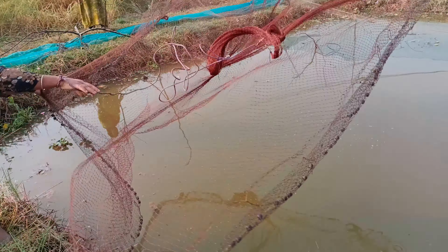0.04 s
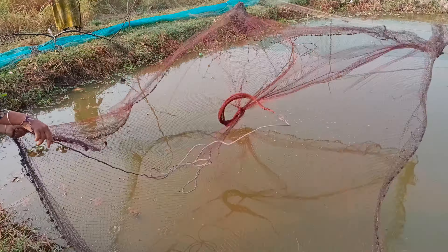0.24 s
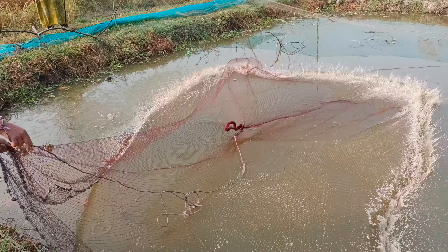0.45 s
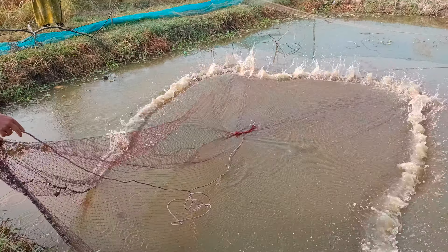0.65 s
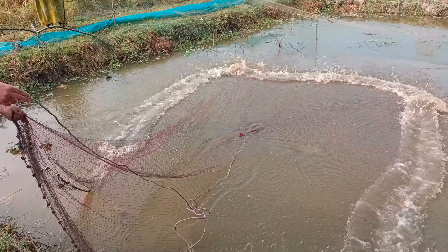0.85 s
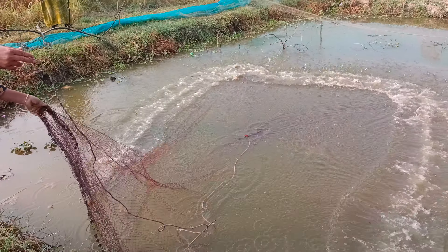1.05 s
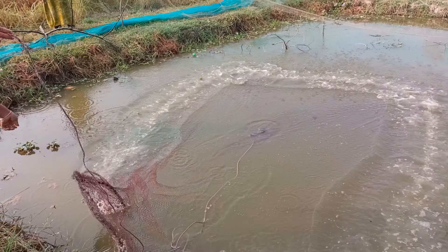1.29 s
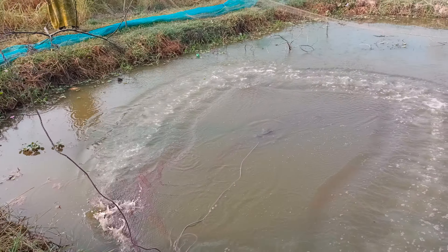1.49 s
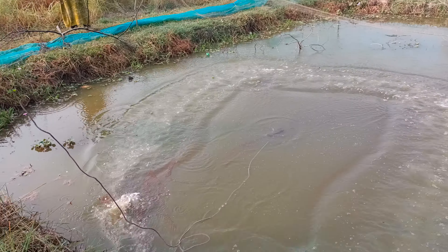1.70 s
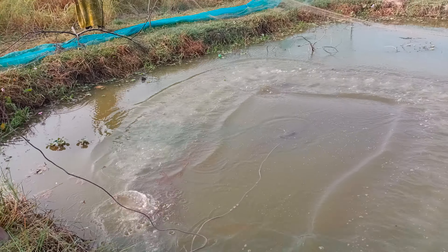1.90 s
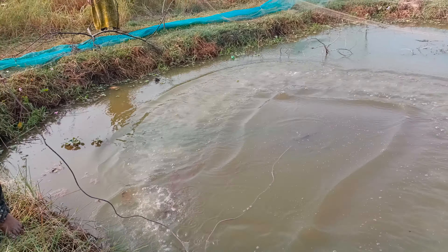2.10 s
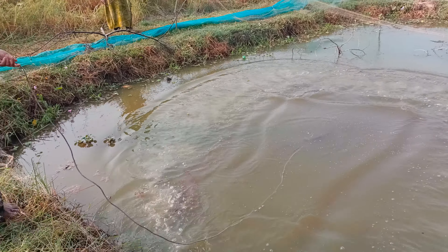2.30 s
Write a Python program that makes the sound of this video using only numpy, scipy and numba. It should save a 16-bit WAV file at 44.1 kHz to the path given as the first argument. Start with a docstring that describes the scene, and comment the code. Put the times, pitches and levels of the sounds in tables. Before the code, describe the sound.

Weighted net hitting water with a hissing, plunking splash, then bubbles, a slop and drips.

```python
"""At the edge of a pond, open air with a faint low rumble, heard on a phone's two microphones.
A cast net swishes out and lands on the water: the mesh hits as a hiss, the lead weights plunge in one
after another, and thrown spray patters back over fizzing bubbles. A second later the trailing bunch
of net slops in by the near bank, to the left, and a few drips follow."""
import sys
import numpy as np
from scipy import signal
from scipy.fft import rfft, irfft, next_fast_len
from scipy.io import wavfile
from numba import njit

SR = 44100
rng = np.random.default_rng(int(sys.argv[2]) if len(sys.argv) > 2 else 0)


def transcribe(signal):
    """Save signal, clipped to [-1, 1], as a 16-bit WAV file at the path in sys.argv[1]."""
    frames = np.atleast_2d(signal).T
    limited = np.clip(frames, -1, 1)
    pcm = np.round(limited * 32767).astype(np.int16)
    wavfile.write(sys.argv[1], SR, pcm)


N = 108045

# low outdoor rumble (time [s], level [dB])
RUMBLE = [(0, -61.5), (1.2, -65), (1.6, -62.5), (1.72, -70.5), (1.9, -65), (2.05, -71.5), (2.45, -74)]
# its spectrum (frequency [Hz], gain [dB])
RUMBLE_COLOUR = [(20, -3.5), (90, 2.5), (140, -1), (180, -10.5), (250, -10), (350, -16.5), (800, -33.5),
                 (3000, -53)]
# faint hiss of open air (frequency [Hz], gain [dB])
AIR_COLOUR = [(100, 12.5), (280, 5), (500, 4), (1200, 3), (3000, -6.5), (16000, -6.5)]

# water dripping back as the net sinks (time [s], level [dB])
DRIPS = [(1.45, -100), (1.54, -67.5), (1.6, -74), (1.78, -80), (1.84, -66.5), (1.88, -74.5), (1.92, -71),
         (1.98, -100)]
# droplets crackling on the surface (time [s], level [dB])
DROPLETS = [(.25, -100), (.45, -55.5), (.9, -60.5), (1.2, -72.5), (1.5, -80), (1.65, -83.5), (2.1, -93)]
# sharp ticks of weights and drops (time [s], level [dB])
TICKS = [(.143, -42), (.1985, -36.5), (.7267, -30), (.898, -37), (1.162, -40.5), (1.215, -40),
         (1.2291, -35.5), (1.2511, -39), (1.273, -36), (1.3833, -28), (1.676, -60), (1.807, -56),
         (1.919, -49)]
# their spectrum (frequency [Hz], gain [dB])
TICK_COLOUR = [(500, -17.5), (1500, -10), (4000, -19), (7000, -0.5), (10000, 8.5), (16000, 0.5)]
# bubbles trapped by single drops and weights (time [s], level [dB], pitch [Hz], ring time [s])
PLOPS = [(.759, -32, 650, 0.037), (1.050, -44, 804, 0.12), (1.104, -44.5, 629, 0.074),
         (1.105, -47, 1757, 0.044), (1.290, -42, 560, 0.0089), (1.338, -43, 790, 0.055),
         (1.3585, -32, 920, .026), (1.386, -38.5, 2255, 0.042), (1.402, -36.5, 694, 0.02),
         (1.4155, -29.5, 1380, 0.0074), (1.442, -36, 776, 0.037), (1.4435, -38, 3070, 0.02),
         (1.462, -41, 633, 0.088), (1.4815, -48, 770, 0.03), (1.482, -30, 1350, 0.0085),
         (1.549, -48, 2570, 0.016), (1.624, -59, 4650, 0.013), (1.677, -58, 2430, 0.012),
         (1.807, -57.5, 2390, 0.02), (1.8305, -52, 5160, 0.0093), (1.844, -46.5, 4680, 0.015),
         (1.892, -63.5, 2480, .04)]
# large air pockets welling up through the net (time [s], level [dB], pitch [Hz])
GLUGS = [(.653, -22.5, 375), (.916, -36.5, 443), (1.379, -38.5, 280), (1.414, -29, 333), (1.439, -33, 295),
         (1.459, -36, 293), (1.477, -35, 255), (1.492, -42, 245)]

# twine sliding through the hand (frequency [Hz], gain [dB])
WHIZZ_COLOUR = [(3000, -37), (8000, -12), (13000, -6), (16000, 1.5)]
# the net in flight (time [s], level [dB])
SWISH = [(0, -65.5), (.06, -63.5), (.108, -58.5), (.152, -58), (.172, -71.5), (.19, -63), (.215, -99.5)]
# its spectrum (frequency [Hz], gain [dB])
SWISH_COLOUR = [(200, -1), (600, -3), (1100, 11), (2000, -3.5), (3300, -11), (5000, -3.5), (6500, -2),
                (10000, 9.5), (16000, 8)]
# trailing net landing by the near bank (time [s], spray level [dB], bubble level [dB])
BUNCH = [(1.19, -100, -100), (1.225, -45.5, -76), (1.265, -56.5, -59), (1.296, -44.5, -42),
         (1.33, -42, -54.5), (1.354, -49.5, -45.5), (1.385, -41, -48), (1.42, -42.5, -50),
         (1.455, -46, -43.5), (1.477, -52.5, -47), (1.488, -43, -42.5), (1.53, -59, -77),
         (1.62, -77.5, -77), (2.1, -105, -105)]
# spectrum of its spray (frequency [Hz], gain [dB])
BUNCH_COLOUR = [(200, -19), (450, -14), (800, -7), (1450, 9.5), (1900, 2), (2400, 9.5), (3100, 1),
                (4100, -6.5), (5000, 3.5), (7000, -7), (10000, 2), (16000, -3.5)]

# the mesh landing and its spray falling back (time [s], level [dB])
SPRAY = [(.22, -61), (.232, -50), (.236, -30), (.29, -37), (.36, -33), (.405, -35), (.44, -29.5),
         (.50, -41.5), (.56, -44.5), (.9, -48), (1.05, -55), (1.2, -60), (1.6, -73.5), (1.93, -70.5),
         (2.05, -85), (2.45, -105)]
# its spectrum (frequency [Hz], gain [dB])
SPRAY_COLOUR = [(200, -26.5), (700, 4.5), (1300, -5.5), (2200, 5), (3200, 0), (6500, 2), (16000, 4.5)]
# bubbles churned in by the mesh (time [s], level [dB])
FIZZ = [(.215, -105.5), (.238, -41), (.44, -36), (.53, -37), (.6, -41.5), (.72, -43), (.86, -45),
        (.95, -45), (1.03, -52.5), (1.2, -65), (2.2, -100)]
# their strength by size (frequency [Hz], gain [dB])
FIZZ_COLOUR = [(500, 4), (750, 4.5), (1000, -1), (1300, 3), (1700, -2.5), (2300, -4), (3000, -8),
               (4300, -11)]
# air pockets dragged under by the lead line (time [s], level [dB])
GULPS = [(.26, -75.5), (.31, -55), (.38, -42), (.41, -41.5), (.46, -40.5), (.495, -38), (.53, -36),
         (.57, -40.5), (.61, -61), (.95, -63.5), (1.2, -89)]
# clumps of weights plunging in
# (time [s], cavity level [dB], cavity pitch [Hz], crack level [dB], slap level [dB])
PLUNGES = [(.297, -30, 441, -25, -33), (.302, -43.5, 433, -30.5, -40.5), (.324, -33.5, 502, -40, -30.5),
           (.340, -27, 483, -45.5, -46.5), (.371, -30, 300, -38, -33.5), (.377, -29, 437, -42, -35.5),
           (.440, -27, 552, -40, -31), (.461, -24, 340, -31, -32.5), (.464, -26, 594, -41.5, -43),
           (.482, -27, 325, -33, -41), (.507, -25.5, 410, -47.5, -27), (.509, -23, 637, -40.5, -28.5),
           (.519, -21.5, 321, -44, -33)]
# their dull slap on the surface (frequency [Hz], gain [dB])
SLAP_COLOUR = [(100, -39), (190, -24.5), (250, 0), (350, -10), (750, -0.5), (1400, 2), (2500, -20.5),
               (16000, -29)]
# the crack of lead on water (frequency [Hz], gain [dB])
CRACK_COLOUR = [(300, -14.5), (800, 3.5), (1600, 1.5), (2250, 8.5), (3200, -10.5), (4500, 5.5), (5600, -4),
                (16000, -8.5)]

# response of the left microphone port (frequency [Hz], gain [dB])
LEFT_PORT = [(250, 4), (600, 1.5), (1000, -2), (1800, 3), (3000, 0), (4500, -0.5), (6000, -4.5),
             (7000, -11), (7800, -5), (9000, 4.5), (9850, 9.5), (11400, -6), (12600, -1.5), (14000, -15),
             (15000, -28.5)]
# response of the right microphone port (frequency [Hz], gain [dB])
RIGHT_PORT = [(250, 4), (600, 0), (1000, -2), (1300, 1), (1800, -4), (3200, -0.5), (4500, 3.5), (5400, 3),
              (6600, 9.5), (7800, -1.5), (9000, -14), (9900, -28.5), (11400, -11.5), (12700, -1),
              (14500, -3), (15600, 0.5)]

NEAR_BANK_LEAD_MS = 0.22  # sound from the near bank reaches the left microphone first


def amp(db):
    """Decibels to amplitude."""
    return 10 ** (np.asarray(db) / 20)


def unit(x):
    """Scales to rms 1."""
    return x / np.sqrt(np.mean(x ** 2))


def envelope(table, column=1):
    """Gain over time from rows of (time [s], level [dB], ..)."""
    rows = np.array(table)
    return amp(np.interp(np.arange(N) / SR, rows[:, 0], rows[:, column]))


def fade(t, t60):
    """Decay of 60 dB in t60 seconds."""
    return np.exp(-np.log(1000) * t / t60)


def colour(x, points):
    """Minimum-phase filter through (frequency [Hz], gain [dB]) points."""
    size = 2 * next_fast_len(N)
    hz, db = np.array(points).T
    bin_hz = np.arange(size // 2 + 1) * SR / size
    gain = amp(np.interp(np.log(bin_hz + 1), np.log(hz), db))
    cepstrum = irfft(np.log(gain))
    cepstrum[1:size // 2] *= 2
    cepstrum[size // 2 + 1:] = 0
    return irfft(rfft(x, size) * np.exp(rfft(cepstrum)))[..., :N]


def passband(x, low_hz, high_hz):
    """Keeps what lies between two frequencies."""
    band = signal.butter(3, [low_hz, min(high_hz, .45 * SR)], "band", fs=SR, output="sos")
    return signal.sosfilt(band, x)


@njit
def ring(starts, hz, t60, size, glide, swell_cycles):
    """Sum of sines that swell and die, each gliding to (1 + 2 * glide) times its starting pitch."""
    out = np.zeros(N)
    for k in range(len(starts)):
        first = int(starts[k] * SR) + 1
        for i in range(max(first, 0), min(first + int(t60[k] * SR), N)):
            t = i / SR - starts[k]
            age = t / t60[k]
            level = size[k] * (1 - np.exp(-t * hz[k] / swell_cycles)) * np.exp(-6.9 * age)
            out[i] += level * np.sin(2 * np.pi * hz[k] * t * (1 + glide * age))
    return out


def bubbles(band_hz, cycles, tilt_db, spread_db, width_ms, count, lead_ms=0):
    """Rising-pitch bubbles of random size and bearing, lead_ms +- width_ms earlier on the left; rms 1."""
    when, pitch, length, strength, bearing = rng.random((count, 5)).T
    starts = (np.arange(count) + when) / count * N / SR
    octaves = pitch * np.log2(band_hz[1] / band_hz[0])
    hz = band_hz[0] * 2 ** octaves
    t60 = cycles * 2 ** (2 * length - 1) / hz
    size = amp(tilt_db * octaves + spread_db * strength ** 2) / np.sqrt(t60)
    lag = (lead_ms + width_ms * (2 * bearing - 1)) / 1000
    pair = [ring(starts + side * lag / 2, hz, t60, size, glide=0.2, swell_cycles=1 / 3)
            for side in (-1, 1)]
    return unit(np.array(pair))


def patter(points, spread_db, width_ms, count, lead_ms=0):
    """Tiny impacts at random bearings, lead_ms +- width_ms earlier on the left; rms 1."""
    when, strength, sign, bearing = rng.random((count, 4)).T
    size = np.sign(sign - .5) * amp(spread_db * np.minimum(-np.log(strength), 5))
    lag = (lead_ms + width_ms * (2 * bearing - 1)) * SR / 1000
    clicks = [np.bincount((when * N + side * lag / 2).astype(int) % N, size, N) for side in (-1, 1)]
    return unit(colour(np.array(clicks), points))


def bursts(rows, t60, column=1):
    """Gain that jumps and dies away for each row of (time [s], level [dB], ..)."""
    t = np.arange(N) / SR
    gains = (amp(row[column]) * (t >= row[0]) * fade(np.abs(t - row[0]), t60) for row in rows)
    return np.sqrt(sum(gain ** 2 for gain in gains))


def cavities(rows, t60, glide, swell_cycles):
    """One ringing air pocket for each row of (time [s], level [dB], pitch [Hz], ..)."""
    starts, db, hz = np.array(rows, float).T[:3].copy()
    return ring(starts, hz, t60 * np.ones(len(rows)), amp(db), glide, swell_cycles)


def outdoors(air_db=-78.5):
    """The bed: low rumble common to both microphones and a faint hiss of air."""
    rumble = envelope(RUMBLE) * unit(colour(rng.standard_normal(N), RUMBLE_COLOUR))
    return rumble + amp(air_db) * unit(colour(rng.standard_normal((2, N)), AIR_COLOUR))


def banks(direct, level_db=-11, t60=0.077):
    """The grassy banks scatter back a short, faint tail."""
    tail = rng.standard_normal((2, SR // 2)) * fade(np.arange(SR // 2) / SR, t60)
    tail /= np.sqrt(np.sum(tail[0] ** 2))
    return amp(level_db) * signal.fftconvolve(direct, tail, axes=1)[:, :N]


def drops():
    """Ticks and light dripping to the left; ahead, droplets crackle as they make tiny bubbles."""
    ticks = patter(TICK_COLOUR, spread_db=-2.5, width_ms=0.21, count=30000, lead_ms=NEAR_BANK_LEAD_MS)
    drips = bubbles((1100, 7500), cycles=8, tilt_db=-3.5, spread_db=8.5, width_ms=0.1, count=1500,
                    lead_ms=0.23)
    crackle = bubbles((6000, 11700), cycles=10, tilt_db=0.5, spread_db=11, width_ms=0.25, count=500)
    return bursts(TICKS, t60=.01) * ticks + envelope(DRIPS) * drips + envelope(DROPLETS) * crackle


def plops(splash_db=-13, splash_octaves=.7):
    """Single drops and weights each trap a ringing bubble; the torn surface splashes round its pitch."""
    out = cavities(PLOPS, t60=np.array(PLOPS)[:, 3], glide=0.0089, swell_cycles=.4)
    t = np.arange(SR // 10) / SR
    ratio = 2 ** splash_octaves
    for start, db, hz, _ in PLOPS:
        splash = unit(passband(rng.standard_normal(len(t)), hz / ratio, hz * ratio))
        first = int(start * SR)
        out[first:first + len(t)] += amp(db + splash_db) * fade(t, t60=.03) * splash
    return out


def glugs():
    """Large air pockets well up through the net, sagging in pitch as they ring."""
    return cavities(GLUGS, t60=0.066, glide=-0.09, swell_cycles=9.0)


def flight(whizz_s=0.096, whizz_width_s=0.031, whizz_db=-47):
    """The twine whizzes through the hand and the mesh rustles as it opens in the air."""
    swell = np.exp(-((np.arange(N) / SR - whizz_s) / whizz_width_s) ** 2)
    whizz = amp(whizz_db) * swell * unit(colour(rng.standard_normal((2, N)), WHIZZ_COLOUR))
    rustle = patter(SWISH_COLOUR, spread_db=6.5, width_ms=0.02, count=12000, lead_ms=0.16)
    return whizz + envelope(SWISH) * rustle


def bunch():
    """Close by on the left, the last fold of net slops in with spray and bubbles."""
    spray = patter(BUNCH_COLOUR, spread_db=1.0, width_ms=0.11, count=5000, lead_ms=NEAR_BANK_LEAD_MS)
    slop = bubbles((600, 1700), cycles=17, tilt_db=4.5, spread_db=6.5, width_ms=0.085, count=600,
                   lead_ms=NEAR_BANK_LEAD_MS)
    return envelope(BUNCH) * spray + envelope(BUNCH, column=2) * slop


def deepen(x, lands_s=0.21, first_hz=1370, octaves_per_s=4.7):
    """A falling low cut: the deeper the mesh sinks, the lower the bubbles it makes."""
    hz, t, frames = signal.stft(x, SR, nperseg=512)
    lowest_hz = first_hz * 2 ** (-octaves_per_s * np.maximum(t - lands_s, 0))
    gain = 1 / np.sqrt(1 + (lowest_hz / (hz[:, None] + 1)) ** 10)
    return signal.istft(frames * gain, SR)[1][:, :N]


def landing():
    """Out on the pond, mesh and spray strike and churn in fizz; the lead line drags larger gulps under."""
    spray = envelope(SPRAY) * patter(SPRAY_COLOUR, spread_db=0.5, width_ms=0.22, count=17000)
    churn = bubbles((611.5, 4417), cycles=24, tilt_db=2.5, spread_db=5.0, width_ms=0.22, count=6000)
    fizz = envelope(FIZZ) * unit(colour(churn, FIZZ_COLOUR))
    gulps = bubbles((282.4, 886), cycles=17, tilt_db=4.5, spread_db=11.5, width_ms=0.11, count=1100)
    return deepen(spray + fizz) + envelope(GULPS) * gulps


def weights():
    """Each clump of lead cracks on the surface, slaps it and leaves a ringing cavity."""
    slap = patter(SLAP_COLOUR, spread_db=-1.0, width_ms=0.47, count=30000)
    crack = patter(CRACK_COLOUR, spread_db=4.1, width_ms=.12, count=30000)
    impacts = bursts(PLUNGES, t60=.02, column=3) * crack
    for row in PLUNGES:
        low_cut_hz = 0.65 * row[2]  # small cavities slap lighter
        impacts += passband(bursts([row], t60=.042, column=4) * slap, low_cut_hz, SR / 2)
    return impacts + cavities(PLUNGES, t60=0.051, glide=0.028, swell_cycles=1.0)


def scene():
    """The cast as heard from the water's edge: direct sound, scatter off the banks and open air."""
    direct = flight() + landing() + weights() + bunch() + drops() + plops() + glugs()
    return direct + banks(direct) + outdoors()


def record(dry, top_hz=15900):
    """Each microphone port of the phone has its own treble resonances; the top is cut steeply."""
    ports = np.array([colour(dry[0], LEFT_PORT), colour(dry[1], RIGHT_PORT)])
    return signal.sosfilt(signal.ellip(10, .2, 70, top_hz, fs=SR, output="sos"), ports)


dry = scene()
out = record(dry)
transcribe(out)
```